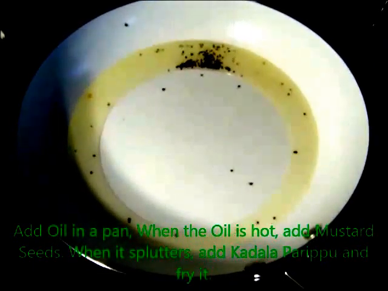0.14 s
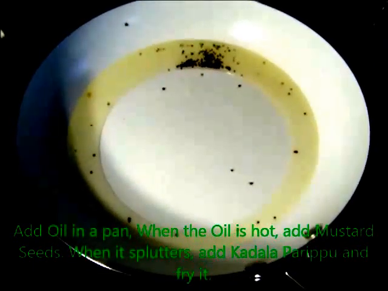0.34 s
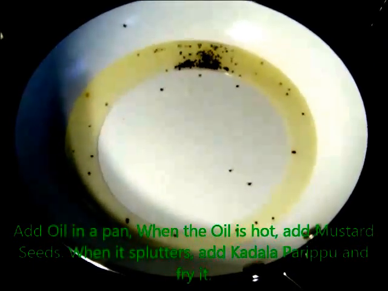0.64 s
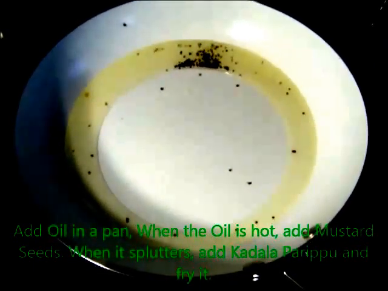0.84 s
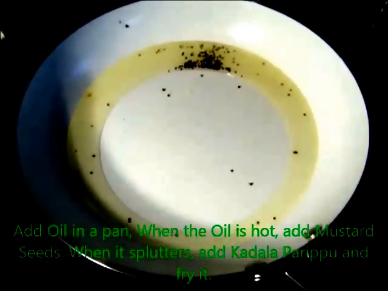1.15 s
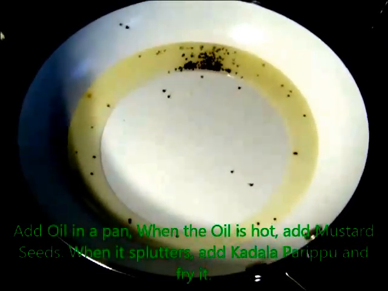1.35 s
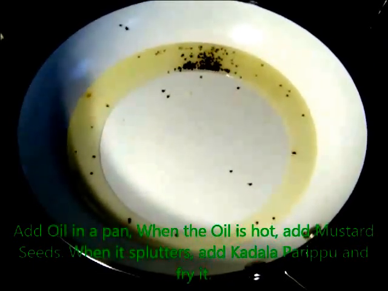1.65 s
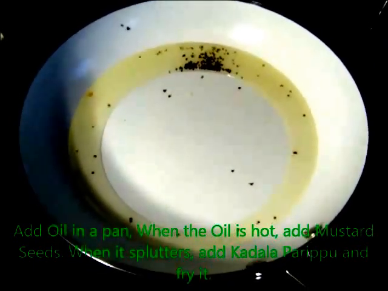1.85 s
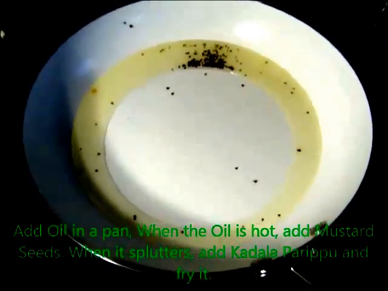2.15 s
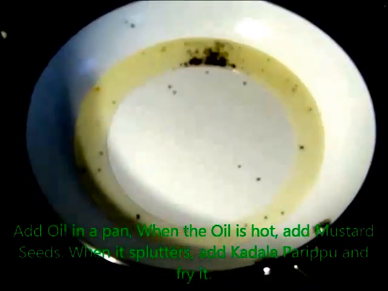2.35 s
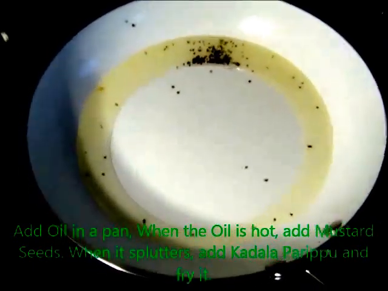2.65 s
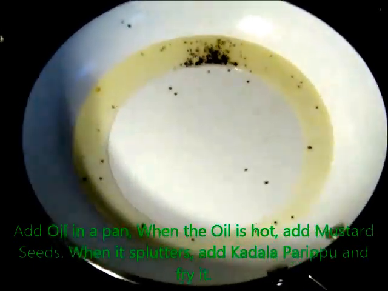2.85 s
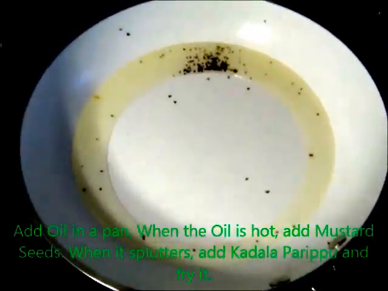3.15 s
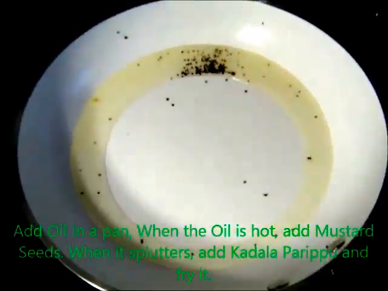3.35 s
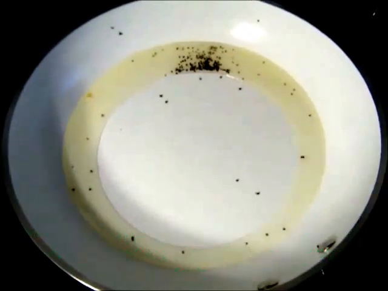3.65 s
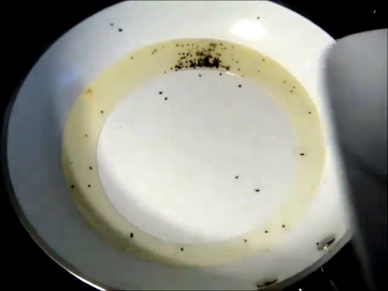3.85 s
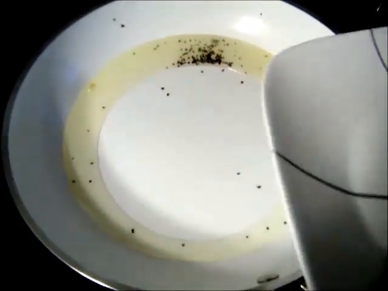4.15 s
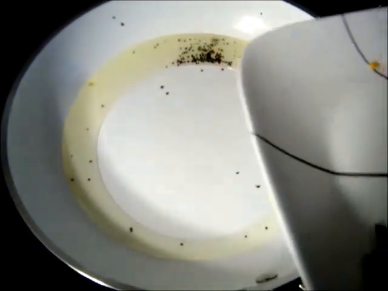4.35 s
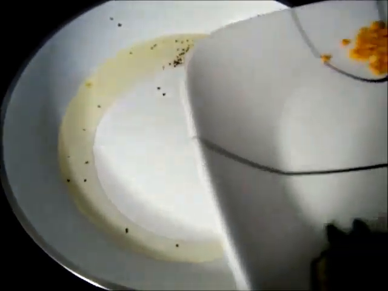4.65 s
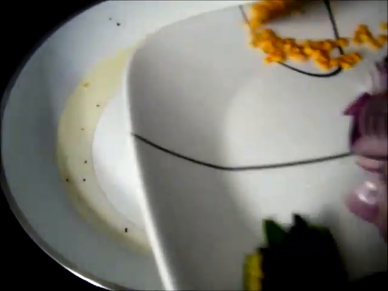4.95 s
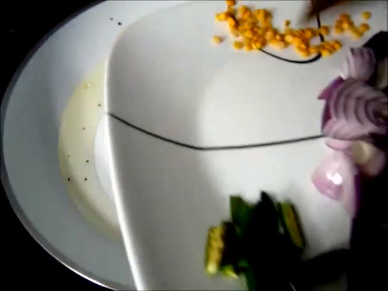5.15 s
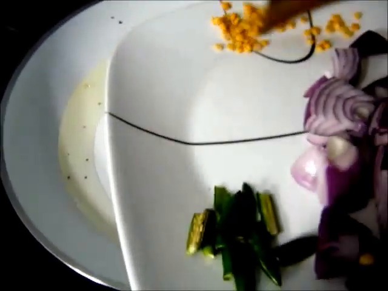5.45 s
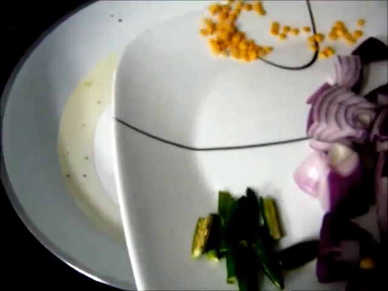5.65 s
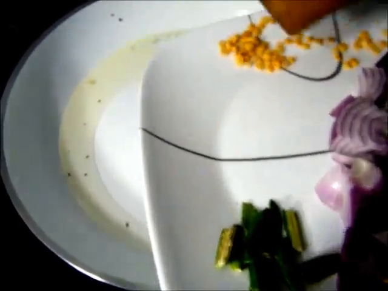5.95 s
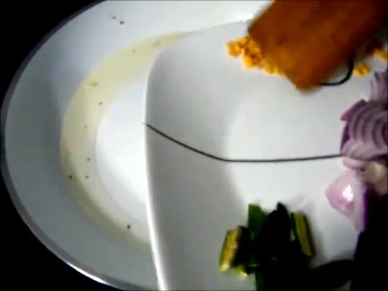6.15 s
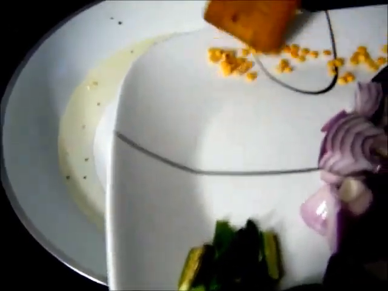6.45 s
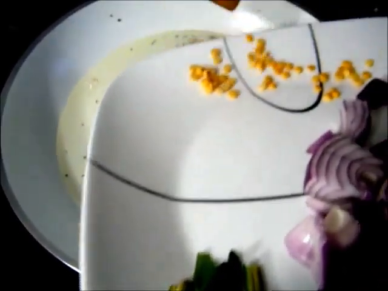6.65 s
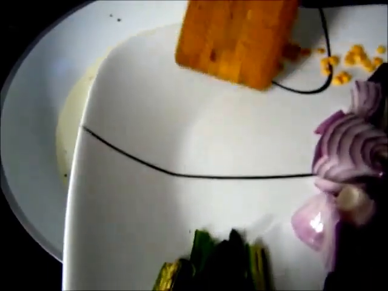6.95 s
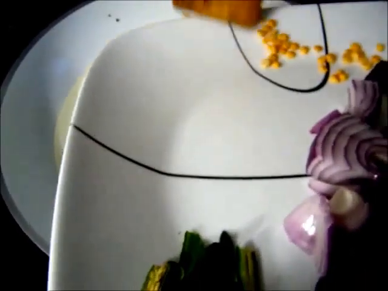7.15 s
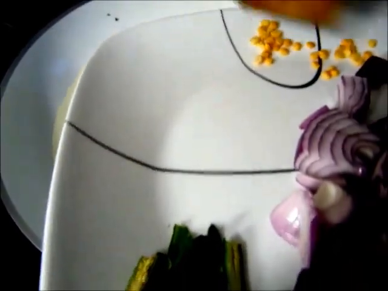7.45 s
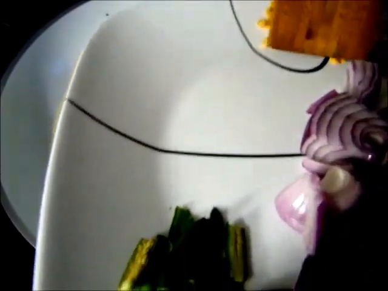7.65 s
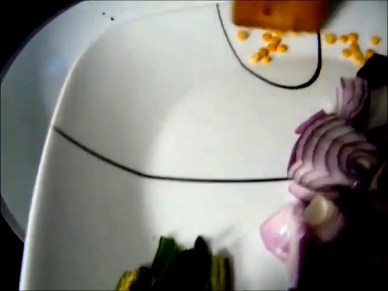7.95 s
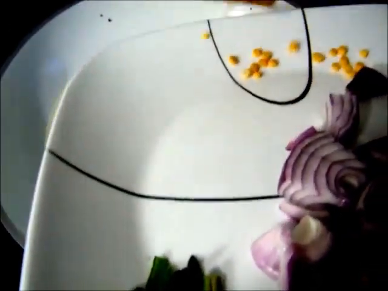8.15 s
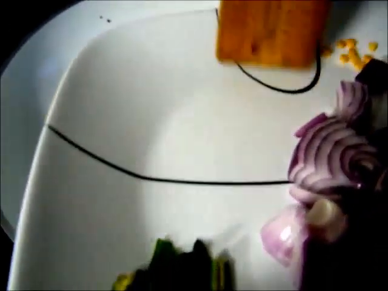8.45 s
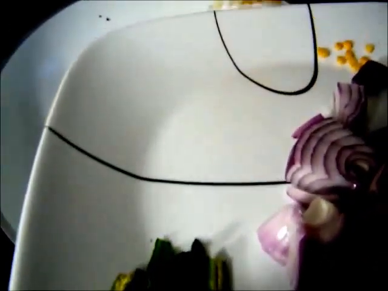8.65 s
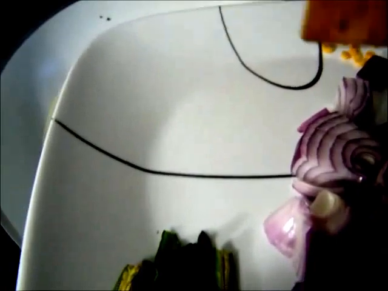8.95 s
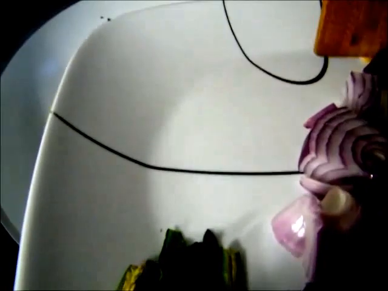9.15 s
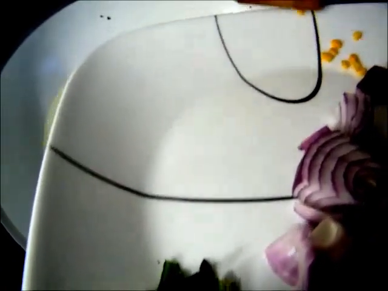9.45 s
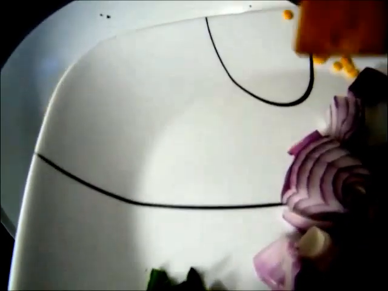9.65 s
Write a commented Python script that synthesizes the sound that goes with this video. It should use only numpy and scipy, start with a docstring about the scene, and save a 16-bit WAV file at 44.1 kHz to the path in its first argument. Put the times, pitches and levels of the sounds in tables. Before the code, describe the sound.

Close-up frying: uneven crackling sizzle with snapping seed pops, followed by woody taps on a ceramic plate and bright clinking sweeps of small dry lentils.

```python
"""Hot oil sizzles and spits in a pan over low kitchen hum; soon mustard seeds pop in it, close to a small microphone.
Pops are short tones with noise puffs; sizzle and spits are shaped noise with the ring of the pan. One knock
near 3.15 s rings on longer notes. Later a wooden spatula knocks on a china plate and sweeps dry lentils, whose
rattle and clinks excite the modes of the china. The hard kitchen answers with short tails; a motor joins the hum."""
import sys
import numpy as np
from scipy import signal
from scipy.fft import rfft, irfft, next_fast_len
from scipy.io import wavfile
from scipy.ndimage import uniform_filter1d, map_coordinates

SR = 44100
rng = np.random.default_rng(int(sys.argv[2]) if len(sys.argv) > 2 else 0)


def store_wav(level_fs):
    """Save 16-bit WAV to argv[1]."""
    pcm = np.round(np.clip(np.atleast_2d(level_fs), -1, 1) * 32767)
    wavfile.write(sys.argv[1], SR, pcm.T.astype(np.int16))


N = 432621
TIME = np.arange(N) / SR

# response of the microphone and its sound port: frequency_hz, gain_db
MIC_RESPONSE = [(100, -21), (1840, -9.5), (2400, -5.5), (2900, 3.5), (3640, -3.5), (4650, -7.5),
                (4850, -17), (5060, -5.5), (6100, -1.5), (7690, -7), (10900, -24.5), (13100, -22),
                (16000, -43)]
HEAD_ON_RESPONSE = MIC_RESPONSE[:6] + MIC_RESPONSE[7:]  # straight ahead there is no dip below 5 kHz


def amp(db):
    """Amplitude ratio of a level in dB."""
    return 10 ** (np.asarray(db) / 20)


def unit(x):
    """x scaled to rms 1."""
    return x / np.sqrt(np.mean(x ** 2) + 1e-20)


def along(points, hz):
    """Value at hz between (frequency, value) points on a log frequency axis."""
    f, v = np.transpose(points)
    return np.interp(np.log(hz + 1), np.log(f + 1), v)


def wobble(rate):
    """A smooth random curve with rate knots a second."""
    knots = rng.standard_normal(int(N * rate / SR) + 4)
    return map_coordinates(knots, [TIME * rate])


def filtered(x, response):
    """x times a complex response of frequency."""
    m = next_fast_len(N + SR // 2)
    spectrum = rfft(x, m) * response(np.fft.rfftfreq(m, 1 / SR))
    return irfft(spectrum, m)[..., :N]


def causal(points):
    """Minimum-phase impulse response of a (Hz, dB) spectrum, by folding its cepstrum."""
    gain = amp(along(points, np.fft.rfftfreq(2048, 1 / SR)))
    cepstrum = irfft(np.log(gain))
    cepstrum[1:1024] *= 2
    cepstrum[1025:] = 0
    return irfft(np.exp(rfft(cepstrum)))


def brighter(x, gain, edge_hz=4600):
    """x with the part above edge_hz scaled by gain."""
    high_pass = signal.butter(3, edge_hz, "high", fs=SR, output="sos")
    return x + (gain - 1) * signal.sosfiltfilt(high_pass, x)


def add(x, s, sound):
    """Mix a sound into x at time s."""
    part = x[round(s * SR):][:len(sound)]
    part += sound[:len(part)]


def swell(s, db, rise, hold, fall):
    """Power of a sound that rises 20 dB in rise seconds to time s, holds, and falls 20 dB in fall seconds."""
    before = np.maximum(s - TIME, 0)
    after = np.maximum(TIME - s - abs(hold), 0)
    return amp(2 * (db - 20 * before / max(rise, .005) - 20 * after / max(fall, .005)))


def grains(per_s, spread_db, t60):
    """Random decaying puffs of noise, a few stronger than most, rms 1."""
    chance, strength = rng.random((2, N))
    sizes = (chance < per_s / SR) * amp(-spread_db * np.log(strength + .04))
    decay = amp(-60 / (max(t60, .001) * SR))
    return unit(signal.lfilter([1], [1, -decay], sizes) * rng.standard_normal(N))


def patchy(x, depth_db, hz_bins, frames):
    """x with a random gain that drifts over frequency and time."""
    z = signal.stft(x, nperseg=256)[2]
    field = uniform_filter1d(rng.standard_normal(z.shape), size=hz_bins, axis=0)
    field = uniform_filter1d(field, size=frames, axis=1)
    return signal.istft(z * amp(depth_db * unit(field)), nperseg=256)[1][:N]


def resonances(modes, hz):
    """Response of (Hz, width Hz, dB) modes of alternating sign, levels as heard through the microphone."""
    total = 0
    for k, (centre, width, db) in enumerate(modes):
        gain = (-1) ** k * amp(db - along(MIC_RESPONSE, centre))
        total = total + gain * 1j * hz * width / (centre * centre - hz * hz + 1j * hz * width)
    return total


def ringing(modes, attack, blur):
    """One blow on a set of (Hz, dB, t60 s) modes, peak 1; wandering phases blur them into a knock."""
    t = TIME[:SR // 3]
    drift = blur * np.cumsum(rng.standard_normal((len(modes), len(t))), axis=1) / np.sqrt(SR)
    hz, db, t60 = np.transpose(modes)[:, :, None]
    scatter_db = rng.normal(0, 1.5, db.shape)  # no two blows are alike
    decay = amp(db + scatter_db - 60 * t / t60)
    ring = np.sum(decay * np.sin(2 * np.pi * hz * t + drift), axis=0) * (1 - np.exp(-t / attack))
    return ring / np.abs(ring).max()


def appliances():
    """Two hums and a motor line are wavering sines; the low kitchen rumble is shaped noise."""
    # steady hums: frequency_hz, rms_level_db
    hums = [(49.5, -53.5), (59.2, -54.5)]
    # a motor that switches on: start_s, frequency_hz, rms_level_db
    motor = (6.1, 119, -52.5)
    # rumble: time_s, level_db (before its waver)
    rumble = [(0.0, -47.5), (0.23, -47), (1.35, -56.5), (2.09, -46.5), (3.75, -51.5), (4.93, -44.5),
              (5.75, -48.5), (6.4, -51.5), (7.76, -47), (8.53, -48.5), (9.35, -49.5), (9.81, -47.5)]
    # rumble spectrum: frequency_hz, relative_level_db (per Hz)
    air_spectrum = [(25, -21), (60, -1.5), (150, -7), (250, -2.5), (334, -2.5), (456, -10), (700, -19.5),
                    (1000, -11), (2200, -44)]

    hum = np.zeros(N)
    for hz, db in hums:
        hum += amp(db + 0.44 * wobble(3.4)) * np.sqrt(2) * np.sin(2 * np.pi * hz * TIME)
    s, hz, db = motor
    fade_in = np.clip((TIME - s) / 0.15, 0, 1)
    hum += amp(db + 1.4 * wobble(7.2)) * np.sqrt(2) * np.sin(2 * np.pi * hz * TIME) * fade_in
    air = unit(filtered(rng.standard_normal(N), lambda f: amp(along(air_spectrum, f))))
    return hum + air * amp(np.interp(TIME, *np.transpose(rumble)) + 2.9 * wobble(21))


def kitchen(x):
    """Hob and tiles answer at once, the far walls longer, each frequency dying at its own speed."""
    # decay of the room: frequency_hz, t60_s
    room_decay = [(300, 0.45), (1500, 0.21), (2500, 0.65), (3500, 0.42), (4600, 0.13), (6000, 0.38),
                  (14000, 0.38)]
    out, hop = np.zeros(N), int(.3 * SR)  # a new random tail every 0.3 s
    for start in range(0, N, hop):
        hz, t, z = signal.stft(rng.standard_normal(SR // 2), SR, nperseg=128)
        close = 2.3 * np.exp(-(t / 0.01) ** 2)
        far = amp(-60 * t / along(room_decay, hz)[:, None])
        tail = signal.istft(z * (close + far), SR, nperseg=128)[1]
        tail = tail / np.linalg.norm(tail)
        add(out, start / SR + .002, signal.fftconvolve(x[start:start + hop], tail))
    return out


def counter_bump():
    """A dull bump makes the modes of the counter ring with a soft onset."""
    # the bump: start_s, level_db (at the microphone, near 145 Hz)
    bump = (8.739, -13.5)
    # counter modes: frequency_hz, relative_level_db, t60_s
    counter_modes = [(164, 13.5, 0.086), (146.4, -8.5, 0.57), (256, -6, 0.31), (540, -20, 0.17),
                     (648, -21.5, 0.41)]
    out = np.zeros(N)
    gain = amp(bump[1] - along(MIC_RESPONSE, 145))
    add(out, bump[0], gain * ringing(counter_modes, attack=0.011, blur=4.7))
    return out


def spatula():
    """Wood on china: a short dense knock of blurred modes, dull noise and one push of the plate."""
    # blows: start_s, level_db (at the microphone, near 255 Hz), hardness_db_per_octave, pitch_ratio (set by the grip)
    taps = [(4.55, -15.5, -5, 1.01), (5.3092, -5.5, 8.5, 1.04), (5.404, -22.5, 7, 1.04),
            (6.256, -15.5, -2.5, 1.08), (6.98, -9.5, -3, 1.02), (7.756, -9, -1, 1.004),
            (8.442, -4.5, -0.5, 0.97), (9.1291, -6, 1, 0.84)]
    # wood modes before pitch ratio and hardness: frequency_hz, relative_level_db, t60_s
    wood_modes = [(320, 2.5, 0.029), (552, 1.5, 0.057), (768, 15, 0.019), (1145, 8, 0.016),
                  (1570, 3, 0.017), (3140, -16, 0.012)]
    out, t = np.zeros(N), TIME[:SR // 3]
    dull = signal.butter(2, 3500, fs=SR, output="sos")
    for s, db, hard_db, ratio in taps:
        modes = [(hz * ratio, level + hard_db * np.log2(hz / 1000), t60) for hz, level, t60 in wood_modes]
        knock = 0.27 * amp(-60 * t / 0.031) * signal.sosfilt(dull, rng.standard_normal(len(t)))
        u = t / .0005
        push = 0.21 * (1 - u) * np.exp(-u)  # the plate yields once
        blow = ringing(modes, attack=0.00029, blur=19.5) + knock + push
        add(out, s, amp(db - along(MIC_RESPONSE, 255)) * blow)
    return out


def plate():
    """Lentils roll and strike as bursts of noise force; all of it rings in the china."""
    # heaps set rolling by the spatula: peak_s, level_db, hold_s (sign ignored),
    # fall_s (for 20 dB, at least 5 ms), brightness_db
    sweeps = [(4.707, -22.5, 0.073, 0.53, -0.5), (4.785, -21.5, 0.07, -0.02, 3),
              (4.912, -29.5, 0.33, -0.3, 3), (5.418, -15, 0.003, 0.62, -3.5),
              (6.317, -22.5, 0.037, 0.5, -6.5), (6.46, -21.5, 0.088, 0.15, -4),
              (6.694, -12, 0.056, 0.11, 2.5), (7.026, -20.5, 0.046, -0.23, -3.5),
              (7.087, -10, 0.0095, 0.19, -6), (7.14, -22.5, 0.012, -0.18, 13),
              (7.368, -5, 0.0024, 0.1433, 0), (7.877, -16.5, 0.005, 0.25, -1), (8.1, -31, 0.035, 0.65, 6.5),
              (8.248, -14, 0.036, 0.0944, 4.5), (8.34, -25.5, 0.078, 0.28, 1),
              (8.445, -24, 0.071, 0.19, -2), (8.551, -17, 0.0027, 0.27, -2), (8.841, -19, 0.017, 0.03, 8)]
    # single lentils striking: start_s, force_db
    clinks = [(4.684, -11.5), (4.7805, -23), (4.8623, -13), (4.9195, -10.5), (4.9594, -10.5), (5.028, -15),
              (5.056, -9.5), (5.4199, -3.5), (5.5842, -22.5), (5.754, -20.5), (5.849, -4), (6.3986, -4),
              (6.4423, -0.5), (6.458, -5), (6.6782, 4.5), (7.0915, -5), (7.102, -0.5), (7.168, -22),
              (7.286, -11), (7.3492, -1.5), (7.366, -5), (7.4132, -3), (7.459, -10), (7.4882, -18),
              (7.525, -13.5), (7.8365, -8), (7.862, -12.5), (7.9204, -5), (7.936, -15), (8.058, -12.5),
              (8.164, -16.5), (8.2268, -7), (8.2476, -4), (8.2587, 3.5), (8.283, -7), (8.3378, -4),
              (8.3983, -8.5), (8.414, -10), (8.4603, -14), (8.5008, -10), (8.5792, -13), (8.623, -12),
              (8.8459, -3.5)]
    # china modes: frequency_hz, width_hz, level_db (as heard through the microphone)
    china_modes = [(752, 66, -8), (1112, 83, -7.5), (1902, 34, -6), (2740, 24, 10.5), (3340, 81, 1.5),
                   (3813, 89, -1), (4430, 45, -2), (5440, 43, 6.5), (6165, 137, -0.5), (7100, 46, 9),
                   (7800, 18, 2), (8160, 42, 4.5), (9000, 44, -3.5), (9700, 38, -6.5), (11100, 31, -10),
                   (12740, 47, -7)]

    rattle = unit(0.42 * rng.standard_normal(N) + grains(380, spread_db=3.5, t60=0.012))
    heaps = np.array([swell(s, db, 0.022, hold, fall) for s, db, hold, fall, _ in sweeps])
    power = heaps.sum(axis=0) + 1e-20
    bright = amp(np.transpose(sweeps)[-1] @ heaps / power)  # louder heaps weigh more in the colour
    force = rattle * np.sqrt(power)
    t = TIME[:SR // 20]
    for s, db in clinks:
        add(force, s, amp(db - 60 * t / 0.02) * rng.standard_normal(len(t)))
    # each lentil lands on another spot and wakes other modes
    force = patchy(force, 2.5, hz_bins=4, frames=5)

    def contact(f):
        """Direct sound of small hard grains, which carry no bass."""
        return 0.97 * (1j * f / (500 + 1j * f)) ** 2 * (1 + 1j * f / 7000)

    strength = np.sqrt(np.abs(uniform_filter1d(force ** 2, size=SR // 20))) / amp(-11.5)
    sharp = np.clip(strength, .1, 10) ** 0.82  # harder contacts are shorter and so brighter
    ring = filtered(force, lambda f: contact(f) + resonances(china_modes, f))
    return brighter(brighter(ring, bright), sharp, edge_hz=8600)


def in_pan(x):
    """The pan adds its ring to what happens in the oil."""
    # pan modes: frequency_hz, width_hz, level_db (as heard through the microphone, before the 0.6 share)
    pan_modes = [(284, 31, -4.5), (1205, 20, -68), (2256, 9.2, 2), (2850, 20, -21), (5865, 53, 5.5)]
    return filtered(x, lambda hz: 1 + .6 * resonances(pan_modes, hz))


def sizzle():
    """Dense tiny bubbles are noise with small spits; flares add their power to the steady sizzle."""
    # steady sizzle: time_s, level_db, brightness_db
    steady = [(0.0, -27, -22), (0.08, -51, -18), (0.6, -27.5, -4), (0.85, -32, 2.5), (1.291, -32, -8),
              (1.9, -30, 2.5), (2.6, -33, -3), (3.11, -32, 4.5), (3.62, -33.5, 2), (3.8, -39.5, 6),
              (4.35, -38.5, 7), (4.66, -28, 1.5), (5.5, -29.5, 2.5), (6.197, -49, 13.5), (7.7, -37.5, 6),
              (8.75, -41, -1), (8.951, -45, 15), (9.81, -39, 10)]
    # flares that rise and die back: peak_s, level_db, rise_s (for 20 dB), fall_s (for 20 dB), brightness_db
    flares = [(0.22, -23.5, 0.27, 0.15, 5), (0.35, -17, 0.058, 0.15, 4.5), (0.919, -19, 0.058, 0.42, 2),
              (1.45, -25, 0.23, 0.43, 4.5), (1.97, -22, 0.083, 0.13, -16), (2.15, -19, 0.015, 0.44, -0.5),
              (2.31, -30, 0.062, 1, 3), (2.66, -28.5, 0.052, 0.74, -14), (4.051, -18, 0.15, 0.16, -5),
              (9.39, -23, 0.16, 0.22, -1.5)]
    # oil spectrum before the pan: frequency_hz, relative_level_db (per Hz)
    oil_spectrum = [(300, 10.5), (600, 3.5), (1200, 7), (2500, 7), (16000, 7)]

    s, level_db, bright_db = np.transpose(steady)
    power = amp(2 * np.interp(TIME, s, level_db))
    treble = power * amp(2 * np.interp(TIME, s, bright_db))
    for s, db, rise, fall, bright_db in flares:
        flare = swell(s, db, rise, 0, fall)
        power = power + flare
        treble = treble + flare * amp(2 * bright_db)
    flutter = amp(3.15 * wobble(25))
    bubbles = 0.84 * rng.standard_normal(N) + 0.34 * grains(70, spread_db=0.5, t60=0.022)
    fizz = patchy(flutter * bubbles, 2.5, hz_bins=4, frames=30)
    fizz = unit(in_pan(filtered(fizz, lambda hz: amp(along(oil_spectrum, hz)))))
    return np.sqrt(power) * brighter(fizz, np.sqrt(treble / power))


def noise_bursts():
    """Short bursts of decaying noise, mostly oil spitting as water flashes to steam."""
    # bursts: start_s, level_db (of the noise, before brightness and onset), brightness_db;
    # the dull one at 3.152 s is the low body of a knock
    bursts = [(0.0988, -12.5, -24), (0.156, -16, -8), (0.201, -12.5, 4.5), (0.2306, -10.5, -2),
              (0.327, -10, 1), (0.498, -11, -5.5), (0.535, -15, -13), (0.657, -21, 8), (1.546, -23, 8),
              (4.369, -13.5, -16), (4.466, -16, -17), (0.8784, -11, -2), (0.8955, -5, -4.5),
              (0.9986, -22, 13), (1.039, -22, 12), (1.425, -17.5, 13), (1.803, -11.5, -17),
              (1.864, -12.5, -9), (1.937, -7.5, -23), (1.9568, -6.5, 2), (1.9977, -10, -15),
              (2.074, -5.5, -23), (2.1278, -2, -5), (2.235, -3, -23), (2.497, -12, -13),
              (2.6367, -8.5, -15), (3.152, -5, -39), (3.2468, -13.5, -31), (3.4245, -11, -7),
              (3.466, -14.5, -12), (3.546, -12.5, -10), (3.567, -17.5, -8), (4.3098, -13.5, 2),
              (4.339, -7, -16), (4.4448, -10, -17), (5.858, -8, 8), (6.128, -18, -25), (6.63, -10.5, 1.5),
              (7.58, -10, -19), (7.7028, -14, -21), (8.641, -8.5, -7), (8.6866, -10.5, 5.5),
              (8.985, -14.5, -20), (9.039, -15.5, -12), (9.369, -8, 2), (9.4885, -9, 8), (9.499, -3, -5.5),
              (9.641, -16, -25), (9.706, -18, -13), (9.774, -11, -24)]
    out, t = np.zeros(N), TIME[:SR // 8]
    for s, db, bright_db in bursts:
        onset = 1 - np.exp(-t / 0.00079)
        puff = amp(db - 60 * t / 0.042) * onset * rng.standard_normal(len(t))
        add(out, s, brighter(puff, amp(bright_db)))
    return out


def pitched_bursts():
    """Short pitched bursts, mostly seeds popping: each a fading tone with a noise puff and a push of air."""
    # bursts: start_s, tone_level_db (at the microphone), pitch_hz, puff_db (relative to the tone),
    # puff_t60_s (also sets the tone's length);
    # the one at 2.2548 s is the lower ringing tone of the pop at 2.254 s;
    # near 3.15 s a knock rings on longer notes
    bursts = [(0.3466, -4, 6100, -4.5, 0.045), (0.5897, 8.5, 2790, -17, 0.015),
              (0.6918, 2, 3880, -13, 0.0099), (0.7798, 2.5, 2710, -14.5, 0.028),
              (1.0953, -2.5, 4550, -8, 0.017), (1.184, -1, 3450, -16.5, 0.021),
              (2.254, 7, 3070, -13, 0.014), (2.2548, 2, 2410, -37, 0.018), (2.6498, 5, 2720, -50, 0.014),
              (2.721, -6, 3420, 3.5, 0.012), (2.832, -8, 3550, -12, 0.015),
              (2.8437, 11.5, 2980, -29, 0.011), (2.9168, 1.5, 3940, -10, 0.014),
              (2.922, 2, 4800, -17, 0.026), (3.1446, -14, 2900, -15, 0.043), (3.15, -21.5, 2590, -29, 0.29),
              (3.146, -22.5, 2190, -29, 0.43), (3.305, 3.5, 3500, -14.5, 0.016),
              (3.6501, 12.5, 2990, -19, 0.012), (5.2005, 1.5, 6670, -6.5, 0.017),
              (5.61, -6, 7200, -10.5, 0.032), (5.802, -10, 7870, -10, 0.033), (5.828, -1.5, 2770, 5, 0.031),
              (5.9192, -10.5, 3970, -5, 0.026), (5.9329, -5, 6050, -2.5, 0.0079),
              (6.0574, 0.5, 5940, -3.5, 0.016), (6.1636, -24, 7700, -5, 0.0061),
              (6.47, 7, 4780, -14, 0.016), (7.0826, -0.5, 2980, -4, 0.039), (7.133, -1, 2760, -11, 0.011),
              (7.1457, 0.5, 4390, -7, 0.023), (7.884, 4.5, 3070, -37, 0.016),
              (8.5502, -4.5, 2680, -2.5, 0.099), (8.5587, -5, 3110, -1, 0.05),
              (8.8302, -5, 2700, -3.5, 0.04), (8.8579, -1, 3040, -10, 0.046)]
    out, t = np.zeros(N), TIME[:SR // 5]
    for s, db, hz, puff_db, t60 in bursts:
        drift = 0.35 * np.cumsum(rng.standard_normal(len(t))) * np.sqrt(hz / SR)
        tone = np.cos(2 * np.pi * hz * t + drift) * np.exp(-(t / (0.069 * abs(t60))) ** 2.0)
        u = t / 0.00014
        push = 0.87 * (1 - u) * np.exp(-u) * np.exp(-abs(t60) / 0.024)  # sudden bursts thump the air once
        hiss, crack = rng.standard_normal((2, len(t)))
        crackle = 6.1 * amp(-60 * t / 0.0053) * np.diff(crack, prepend=0)
        puff = amp(puff_db) * (amp(-60 * t / abs(t60)) * hiss + crackle)
        # divide out the microphone's gain at this pitch
        add(out, s, amp(db - along(HEAD_ON_RESPONSE, hz)) * (tone + puff + push))
    return out


def scene():
    """Sources and room enter the sound port, pitched bursts from straight ahead; appliances bypass it."""
    bursts = pitched_bursts()
    rest = in_pan(noise_bursts()) + plate() + spatula() + counter_bump()
    heard = rest + amp(-9.0) * kitchen(bursts + rest) + sizzle()
    # the sound port resonates near 3 and 6 kHz
    port = signal.fftconvolve(heard, causal(MIC_RESPONSE))
    port += signal.fftconvolve(bursts, causal(HEAD_ON_RESPONSE))
    return (port[:N] + appliances())[None]


def record(dry):
    """The microphone hisses faintly, loud bursts saturate towards full scale; nothing passes the band limit."""
    top_hz = 16300
    loud = dry + amp(-61) * rng.standard_normal(dry.shape)
    clipped = loud / (1 + np.abs(loud) ** 8) ** (1 / 8)
    return filtered(clipped, lambda hz: hz < top_hz)


dry = scene()
out = record(dry)
store_wav(out)
```